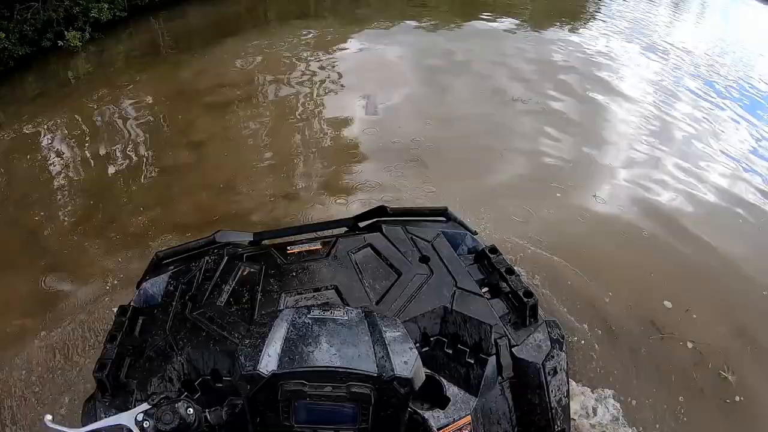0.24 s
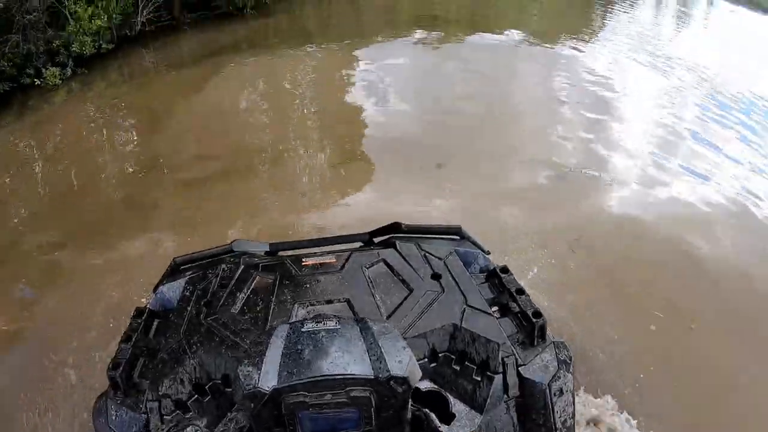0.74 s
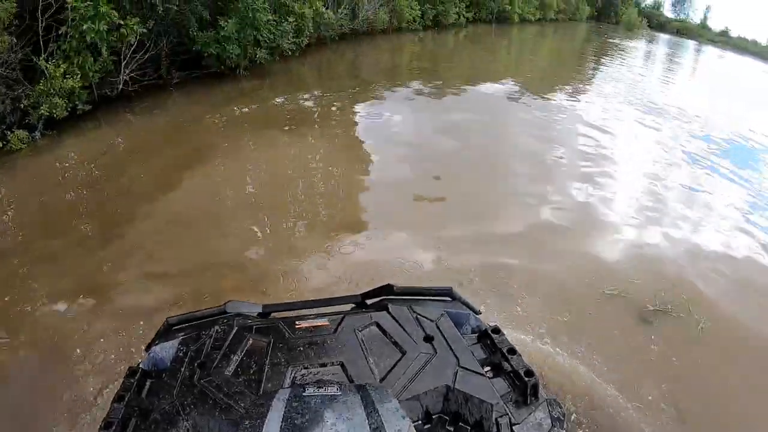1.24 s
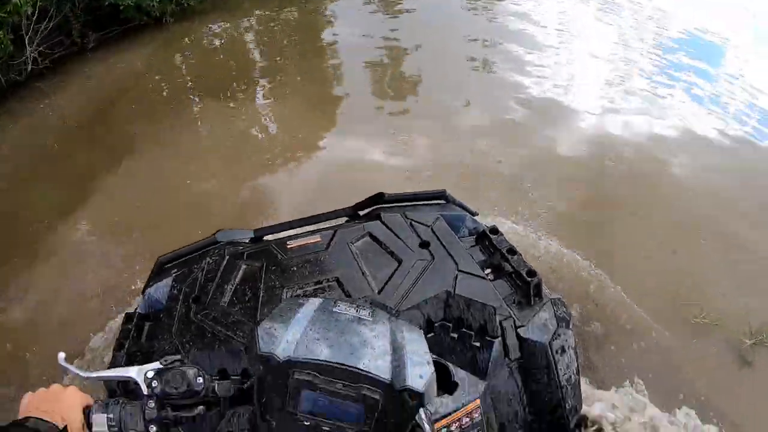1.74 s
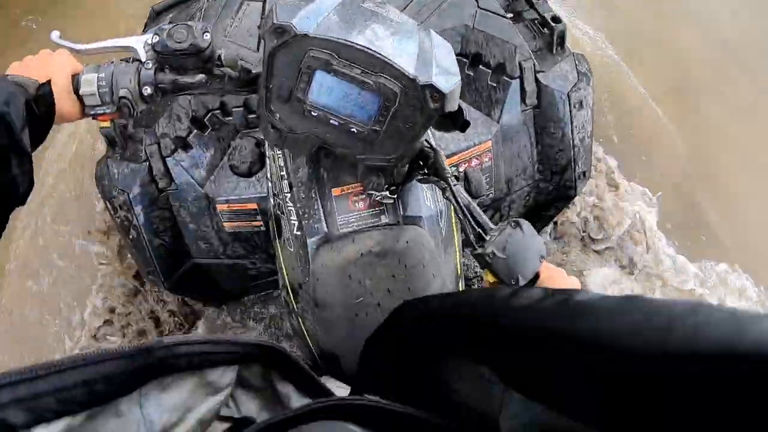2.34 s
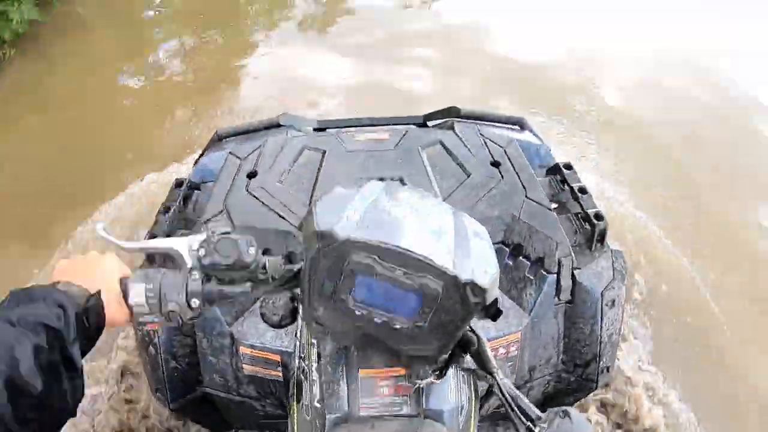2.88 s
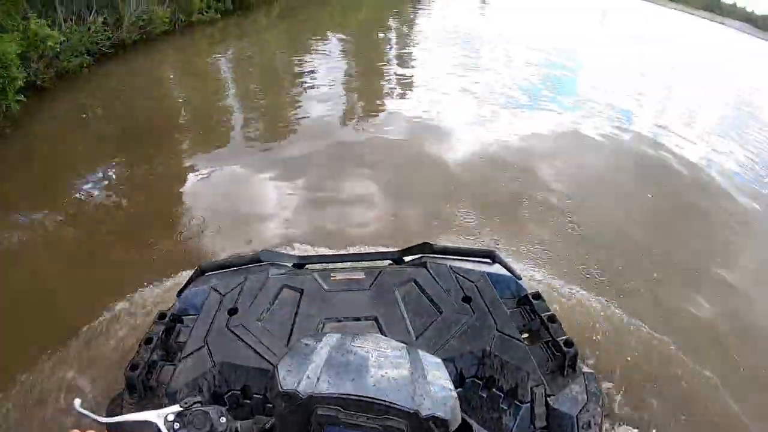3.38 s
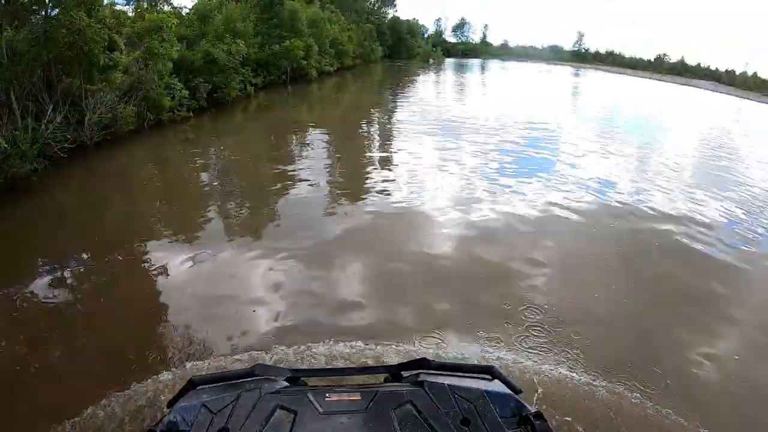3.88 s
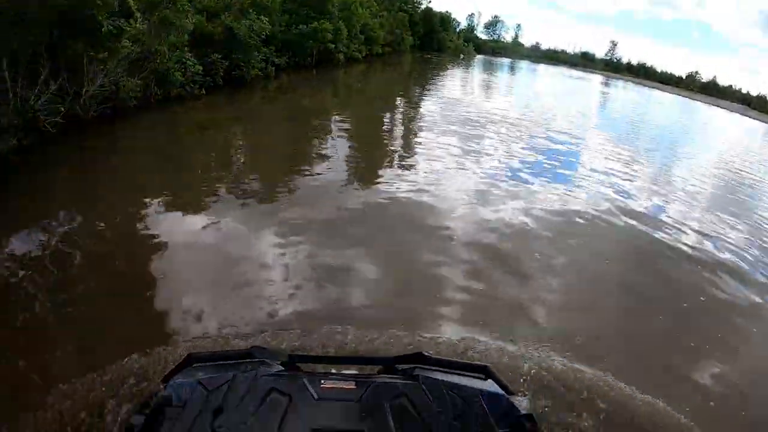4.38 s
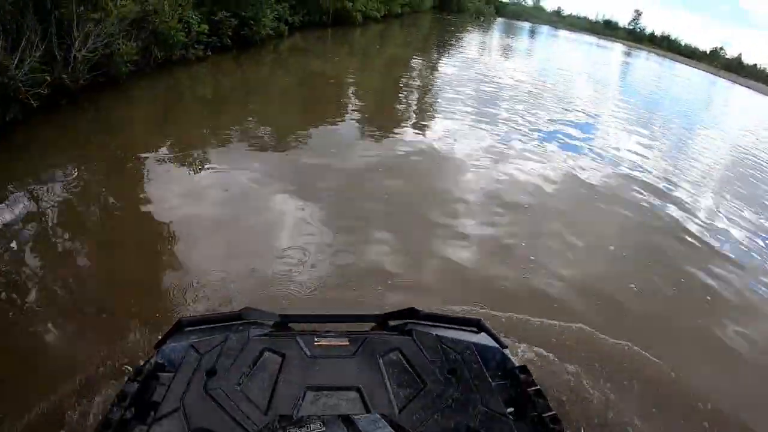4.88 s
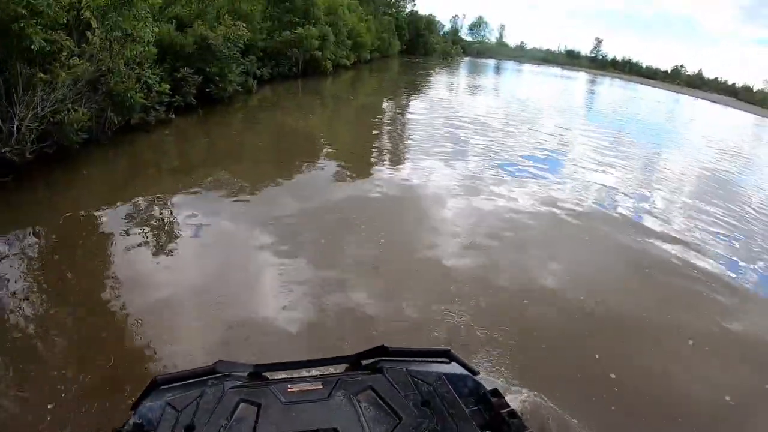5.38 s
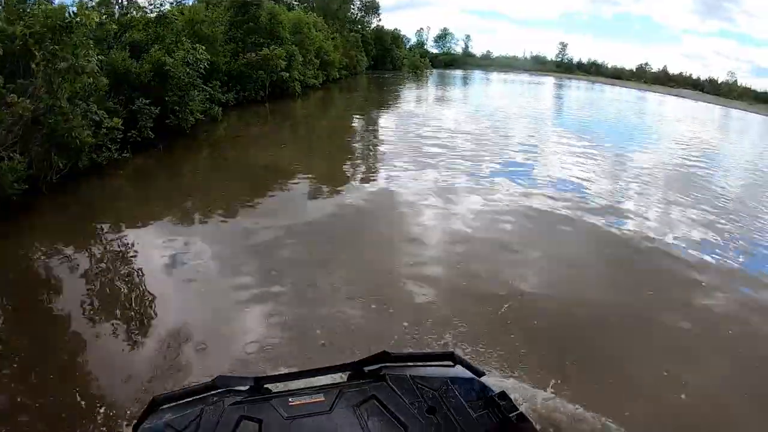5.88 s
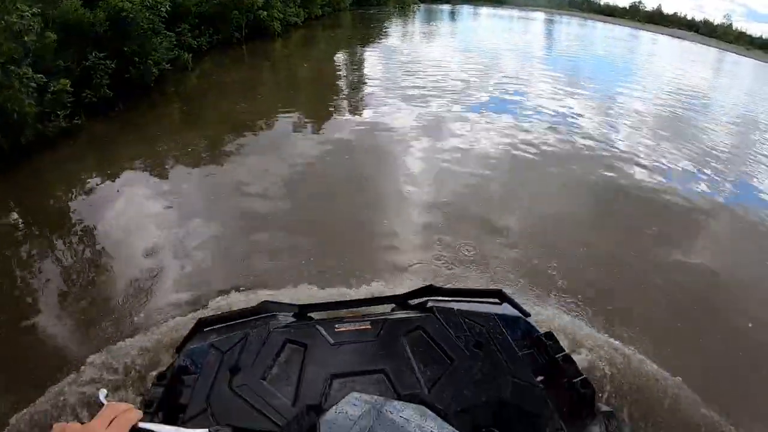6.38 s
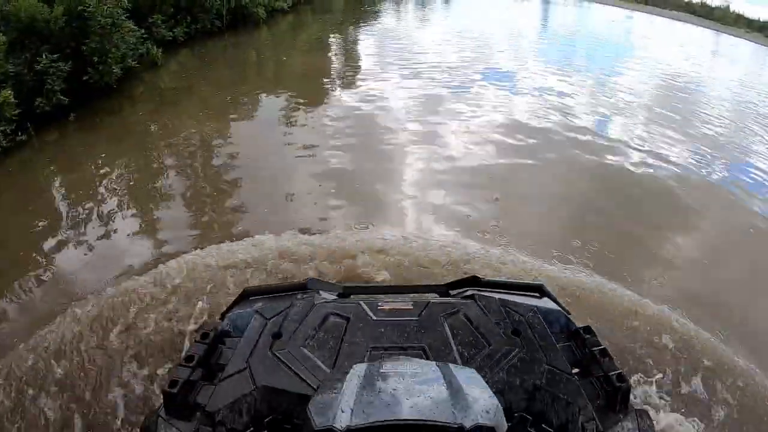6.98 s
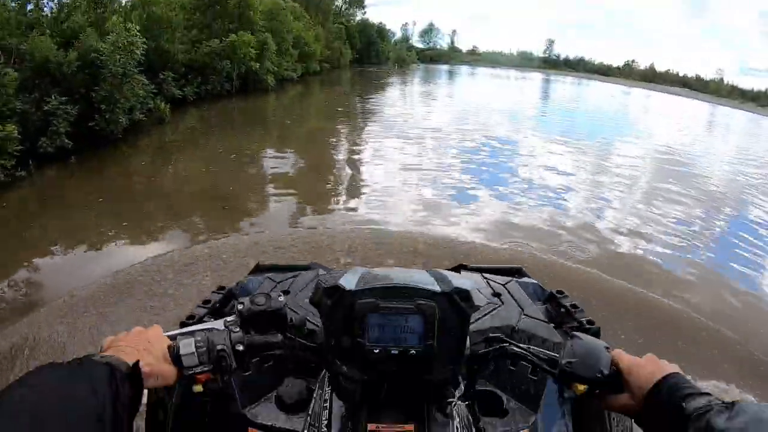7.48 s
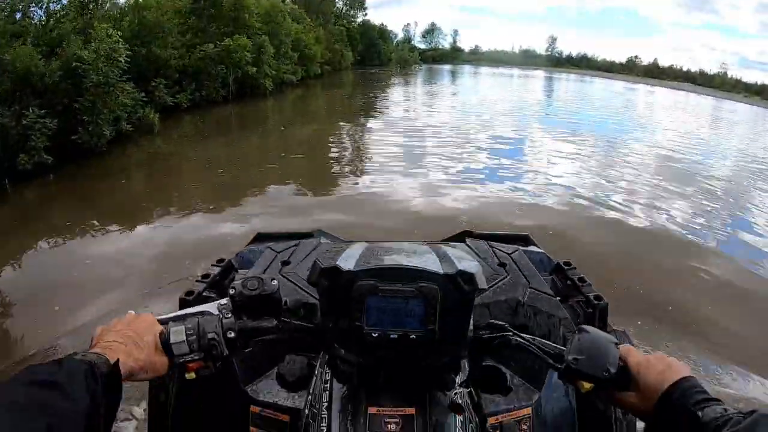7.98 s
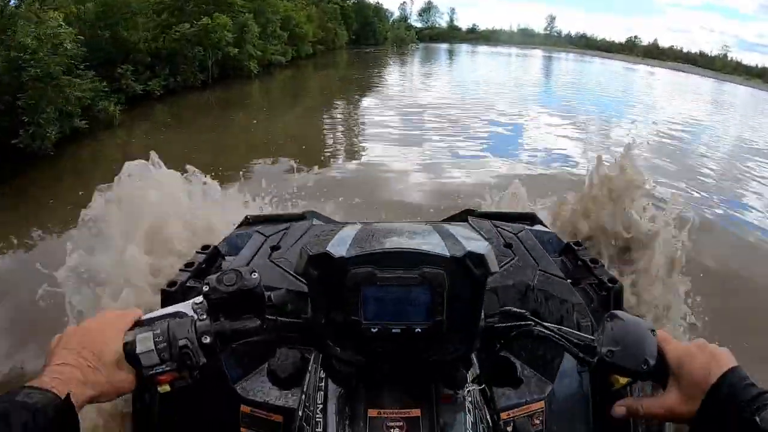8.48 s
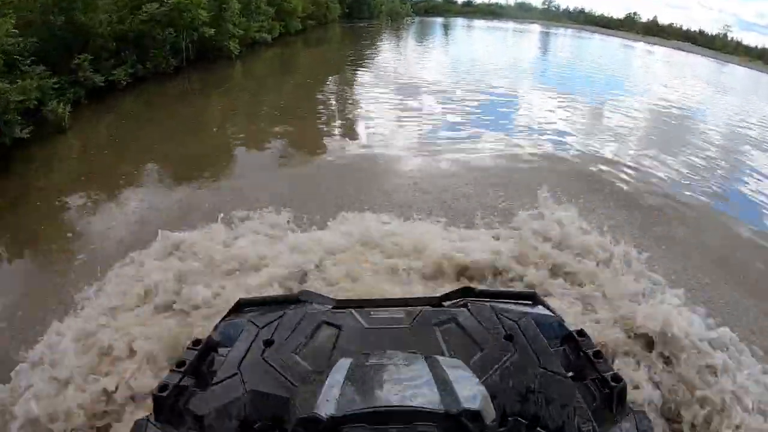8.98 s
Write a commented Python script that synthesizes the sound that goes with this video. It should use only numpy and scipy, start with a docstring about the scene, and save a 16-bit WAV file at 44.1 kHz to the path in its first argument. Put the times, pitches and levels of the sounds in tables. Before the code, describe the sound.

Close, throaty quad engine pulls, dips and snarls up to one big rev, while muddy water churns, hisses and slaps around the body.

```python
"""Quad bike wading through flood water

Recorded at the rider's chest with a two-port microphone, everything close by. The twin-cylinder engine,
a sum of crank-locked tones plus puffs of gas, pulls steadily, lets off twice, revs hard once, coasts down
into its bow wave and picks up at the very end. Gears and belt whine faintly at multiples of engine speed;
the churning water and spray are coloured noise with bubble chirps, and slaps of water hit the body."""
import sys
import numpy as np
from scipy import signal
from scipy.fft import rfft, irfft, next_fast_len
from scipy.io import wavfile
from scipy.ndimage import uniform_filter1d, minimum_filter1d, map_coordinates

SR = 44100
rng = np.random.default_rng(int(sys.argv[2]) if len(sys.argv) > 2 else 0)


def digitize_waveform(pressure):
    """Quantize a signal to 16-bit integers and store it at the path in sys.argv[1].

    Rows of a 2-D input are taken as channels; values are limited to [-1, 1].
    """
    field = np.atleast_2d(pressure).T
    bounded = np.clip(field, -1, 1)
    quanta = np.round(bounded * 32767).astype(np.int16)
    wavfile.write(sys.argv[1], SR, quanta)


N = 407043
TIME = np.arange(N) / SR  # seconds

# Throttle pulls, one curve each, with coasting between: [start_s, four_stroke_cycles_per_s]
THROTTLE_PULLS = [
    [(0.0, 27.9), (0.5, 27.6), (0.85, 30), (1.53, 28.9), (1.9, 29.1), (2.93, 30.4), (3.78, 26.7),
     (3.83, 27.1), (3.98, 30.6), (4.0, 30.7)],
    [(4.27, 23), (4.45, 25), (4.64, 23.7), (4.98, 28.9), (5.4, 30.9), (5.8, 32.7), (5.99, 31.3),
     (6.41, 32.5)],
    [(7.29, 11.2), (7.382, 14.7), (7.498, 22.8), (7.598, 29.7), (7.77, 38.3), (7.988, 50.0), (8.07, 52.0),
     (8.17, 52.2)],
    [(9.15, 14.2), (9.25, 23.8)],
]
# Engine tones, relative strength: [multiple_of_cycle_rate, coasting_db, cruising_db, wide_open_db]
ENGINE_TONES = [(1, -12, -11, -10), (2, 0, 1, 0), (3, 8.5, -8.5, -4.5), (4, -7, -7.5, -7),
                (5, 4.5, 5.5, 3.5), (6, -8, 6, 8.5), (7, -6, 2, -4.5), (8, 3.5, 5, 6.5), (9, -11, -1, 5),
                (10, -5.5, 5, 2.5), (11, 1.5, 5, 4.5), (12, -2.5, -1.5, 3), (13, 0, 3.5, -3.5),
                (14, -7.5, 0, 7), (15, 1.5, -4.5, 2), (16, -8, 0.5, -1.5)]
# Resonance of airbox and pipe: [pitch_hz, level_db]
AIRBOX_AND_PIPE = [(13, -28.5), (25, -5.5), (45, -5), (70, -0.5), (100, 0.5), (130, 1.5), (155, 3.5),
                   (190, -6), (240, -19), (320, -20), (420, -28), (550, -31), (700, -36.5), (850, -42.5),
                   (1300, -70.5)]
# How much of the bark each frequency takes: [pitch_hz, share_ratio]
BARK_SHARE = [(60, 0.38), (150, -0.32), (220, 0.31), (320, 0.97), (480, 0.96), (750, -0.1)]
# Engine loudness, coasting row then pulling row: [level_at_cruise_db, rise_db_per_cycle_per_s]
LOUDNESS_LAW = [(-23, 0.24), (-20.5, 0.42)]
# Intake bark, coasting row then pulling row: [bark_at_cruise_db, rise_db_per_cycle_per_s]
INTAKE_BARK_LAW = [(0, 0.37), (5, -0.3)]
# Harder squeezes of the throttle: [start_s, end_s, extra_bark_db]
THROTTLE_SQUEEZES = [(-.2, 0.696, 5.5), (.75, 1.65, 2), (3.758, 3.92, 5.5), (4.585, 4.945, 6),
                     (7.46, 8.202, 13.5)]
# Engine difference between the two microphone ports: [pitch_hz, side_minus_mid_db]
PORT_DIFFERENCE = [(60, -35), (160, -26), (300, -24), (430, -22), (600, -1), (850, 8)]
# Steady whine of the drive, before the left/right trim: [lower_gear_db, upper_gear_db, belt_rush_db]
STEADY_WHINE = (-57.5, -57.5, -58.5)
# Swells of the whine: [centre_s, half_length_s, lower_gear_rise_db, upper_gear_rise_db, belt_rise_db]
DRIVE_SWELLS = [(.8, .9, 13, 12, 12), (2.55, 0.74, 17, 3, 17), (3.3, .25, 4, 17, 7),
                (8.05, .3, 6, 13, 17.5)]
# Water, churn row then spray row, before their trims: [coasting_level_db, rise_when_driven_db]
WATER_LEVELS = [(-39, 1.61), (-46.5, 0.55)]
# Surges along the body, the last being the bow wave: [centre_s, half_length_s, churn_rise_db, spray_rise_db]
WATER_SURGES = [(2.1, 1.18, 2, 2.5), (6.15, 0.33, .7, 1.9), (7.42, 0.088, 3, 0.8), (8.25, 0.21, 3.5, 3),
                (8.83, 0.27, 4.5, 7.5)]
# Slaps on the body, before the shares taken by churn and spray: [start_s, level_db, decay_s]
WATER_SLAPS = [(3.835, -38, 0.022), (4.33, -46, 0.04), (6.02, -49, 0.044), (6.45, -50, .04),
               (7.43, -46, .04), (8.78, -49, 0.068), (8.939, -48, .04)]
# Colour of the churned water, relative: [pitch_hz, level_db_per_hz]
CHURN_COLOUR = [(100, 3.5), (300, 10.5), (600, 4.5), (850, -6), (1150, -0.5), (1700, -2), (2100, -4),
                (2600, -3.5), (3300, -12), (4500, -22), (8000, -47.5)]
# Colour of the spray, relative: [pitch_hz, level_db_per_hz]
SPRAY_COLOUR = [(1500, -26.5), (3000, -8.5), (4000, -3), (4700, -3.5), (5400, 0), (6300, 0), (7400, -2),
                (8400, -9), (9700, -11), (11200, -25.5), (13000, -28.5), (15500, -35)]
# Likeness of the water at the two ports: [pitch_hz, likeness_0_to_1]
PORT_LIKENESS = [(200, 1), (600, 0.66), (1200, 0.41), (2400, 0.43), (5000, 0.31), (10000, 0.39)]
# Water level between the ports: [pitch_hz, left_minus_right_db]
PORT_LEAN = [(300, 1.5), (590, -3.5), (1050, -7.5), (1850, -6.5), (3290, -3), (5820, -8), (10300, 1)]
# Phase of the shared water between the ports: [pitch_hz, left_lead_radians]
PORT_LEAD = [(400, -0.5), (700, 0.2), (1200, 1.5), (1700, -1), (2800, -2), (3300, 1.1), (4200, .5),
             (5000, -1), (6500, -3.5), (8000, -3.5), (10500, -5)]

# Cycles per second: cruising, idle, and the range over which the wide-open voice takes over
CRUISE_SPEED, IDLE_SPEED, OPEN_FROM, OPEN_AT = 29, 11.2, 45, 46
# Coasting: friction in cycles per second lost each second, and the speed at which pumping drag equals it
FRICTION, DRAG_SPEED = 13, 19.85
# Ramps of the throttle as it opens or shuts, and of the squeezes
THROTTLE_S, SQUEEZE_RAMP_S = 0.034, 0.12
# The intake gulps as the throttle snaps open; the bark lingers after it shuts
GULP_DB, GULP_S, LINGER_DB, LINGER_S = 6.5, 0.046, 6.5, 0.1
SECOND_FIRING = 3 / 8  # the second cylinder's place in the cycle


def engine(puff_cycles=0.21, rasp_hz=480, rasp_bark=0.92, sharpen_db=5, crisp_db=2, puff_db=-21,
           rasp_db=-8, growl_db=4, growl_hz=340, tone_count=44, step=7):
    """Uneven twin pulses and puffs of gas ring the airbox; an open throttle makes it bark."""
    rate = SR / step
    t = TIME[::step]
    speed, turns = crank(t)
    level_db, bark_db, throttle = effort(t, speed)
    # shares of the coasting, cruising and wide-open voices
    voices = np.maximum(1 - abs(2 * throttle - np.arange(3)[:, None]), 0)

    # no two firings are alike, and the engine runs less evenly when slow
    slow = 28 / speed
    turns = turns + .0015 * slow * drift(t, 45)
    level_db = level_db + .25 * slow ** 2 * drift(t, 35)
    bark_db = bark_db + slow * drift(t, 40)

    # cruising sharpens the pulses, a fast cruise most
    fast = np.clip((speed - 29) / 3, 0, 1)
    edge_db = sharpen_db * voices[1] * fast * (bark_db < 10)
    edge_db = uniform_filter1d(edge_db, size=600) + crisp_db * voices[1]

    pulses = np.zeros(len(t))
    for k in range(1, tone_count + 1):
        # above the table, its last eight rows repeat
        row = k - 1 if k <= 16 else 8 + (k - 9) % 8
        twin_phase = np.angle(1 + .8 * np.exp(-2j * np.pi * k * SECOND_FIRING))
        db = np.dot(ENGINE_TONES[row][1:], voices) + bark_db * read(BARK_SHARE, k * speed)
        db = db + edge_db * (k > 15)
        # wide open, the upper multiples growl
        db = db + growl_db * voices[2] * np.clip(k * speed / growl_hz * 4 - 4, 0, 1)
        pulses += amp(db) * np.cos(2 * np.pi * k * turns + twin_phase)

    # gas rushes through the valves with each firing
    puffs = unit(strokes(turns, puff_cycles) * rng.standard_normal(len(t)))
    band = signal.butter(2, [rasp_hz / 2, rasp_hz * 2], "band", fs=rate, output="sos")
    rasp = signal.sosfilt(band, puffs)
    gas = amp(puff_db) * puffs + amp(rasp_bark * bark_db + rasp_db) * rasp
    gas = gas * np.sqrt(rate / speed) / 2

    drive = reflect(amp(level_db) * (gas - pulses), .0066, .25, rate)
    rung = ring(drive, AIRBOX_AND_PIPE, rate)
    return signal.resample_poly(rung, step, 1, window=("kaiser", 10))[:N]


def crank(t):
    """Cycle rate and cycles turned: after each pull, friction and drag run the engine down to idle."""
    speed = np.zeros(len(t))
    for pull in THROTTLE_PULLS:
        s, rate = np.transpose(pull)
        # friction plus drag growing with speed squared gives a tangent curve
        angle = np.arctan(rate[-1] / DRAG_SPEED) - (t - s[-1]) * FRICTION / DRAG_SPEED
        coast = np.maximum(DRAG_SPEED * np.tan(np.clip(angle, 0, np.pi / 2)), IDLE_SPEED)
        pulled = np.where(t <= s[-1], np.interp(t, s, rate), coast)
        speed = np.where((t >= s[0]) | (speed == 0), pulled, speed)
    turns = np.cumsum(speed) * (t[1] - t[0]) - .45
    return speed, turns


def effort(t, speed):
    """Level, bark and throttle (0 shut, .5 cruising, 1 wide open): speed and load set the engine's voice."""
    held = pulling(t)
    level_db = follow_law(LOUDNESS_LAW, held, speed)
    bark_db = follow_law(INTAKE_BARK_LAW, held, speed)
    gulps = sum((t > pull[0][0]) * np.exp(-abs(t - pull[0][0]) / GULP_S) for pull in THROTTLE_PULLS[1:])
    squeeze_db = sum(db * gate(t, start, end, SQUEEZE_RAMP_S) for start, end, db in THROTTLE_SQUEEZES)
    lingers = sum(np.exp(-abs(t - pull[-1][0]) / LINGER_S) for pull in THROTTLE_PULLS)
    bark_db = bark_db + held * (GULP_DB * gulps + squeeze_db) + (1 - held) * LINGER_DB * lingers
    wide = np.clip((speed - OPEN_FROM) / (OPEN_AT - OPEN_FROM), 0, 1)
    return level_db, bark_db, held * (1 + wide) / 2


def follow_law(law, held, speed):
    """Blends the coasting and pulling laws, each a straight line in dB against engine speed."""
    coasting_db, pulling_db = (db + slope * (speed - CRUISE_SPEED) for db, slope in law)
    return (1 - held) * coasting_db + held * pulling_db


def pulling(t):
    """1 while the throttle is held, 0 while it is shut."""
    return sum(gate(t, pull[0][0], pull[-1][0], THROTTLE_S) for pull in THROTTLE_PULLS)


def strokes(turns, length):
    """A decaying puff for each cylinder; the second fires three eighths of a cycle after the first."""
    return np.exp(-(turns % 1) / length) + np.exp(-((turns - SECOND_FIRING) % 1) / length)


def reflect(x, seconds, share, rate):
    """Waves run up and down the pipe: each pulse is drawn out, its colour unchanged (an all-pass)."""
    loop = np.zeros(int(seconds * rate) + 1)
    loop[0], loop[-1] = 1, -share
    return signal.lfilter(loop[::-1], loop, x)


def ring(x, points, rate, size=4096):
    """Causal filter with the given spectrum: resonances ring after each pulse."""
    log_gain = np.log(amp(read(points, abs(np.fft.fftfreq(size, 1 / rate)))))
    # minimum phase, so that nothing sounds before its pulse
    taps = np.fft.ifft(np.exp(signal.hilbert(log_gain).conj())).real[:size // 2]
    return signal.oaconvolve(x, taps)[:len(x)]


def ports(x, angle=2.13):
    """The bass reaches both microphone ports alike; higher tones arrive out of step (angle in radians)."""
    size = next_fast_len(N + 4096)
    side_gain = amp(read(PORT_DIFFERENCE, np.fft.rfftfreq(size, 1 / SR)))
    side = irfft(rfft(x, size) * side_gain * np.exp(1j * angle), size)[:N]
    return np.array([x + side, x - side])


def churn(trim_db=5.0, throb=0.28, slap_share=0.55):
    """Wheels churn the water into bubbling foam, which shakes with each firing and swells with each slap."""
    grains = bubbles(900, 2.5, 500.6, 3502, 7)
    wash = foam(CHURN_COLOUR, grains, grain_share=0.64, patchy_db=0.5, flicker_db=0.68)
    shake = strokes(crank(TIME)[1], 0.18)
    steady = amp(water_levels()[0] + trim_db) * (1 + throb * (shake - shake.mean()))
    return wash * (steady + slap_share * slaps())


def spray(trim_db=-0.1, slap_share=0.6):
    """Fine droplets hiss above the churn and burst out with each slap on the body."""
    grains = bubbles(3000, 2.9, 3000, 13000, 4)
    hiss = foam(SPRAY_COLOUR, grains, grain_share=0.59, patchy_db=1.1, flicker_db=-0.6)
    return hiss * (amp(water_levels()[1] + trim_db) + slap_share * slaps())


def water_levels():
    """Churn and spray levels in dB: higher while the wheels are driven, swelling with each surge."""
    driven = pulling(TIME)
    return swells(WATER_SURGES, TIME) + [db + more_db * driven for db, more_db in WATER_LEVELS]


def slaps(attack_s=0.0023):
    """Envelope of the water slapping the body: a quick rise, then an exponential decay."""
    out = np.zeros(N)
    for s, db, decay_s in WATER_SLAPS:
        age = np.maximum(TIME - s, 0)
        out += amp(db) * (1 - np.exp(-age / attack_s)) * np.exp(-age / decay_s)
    return out


def foam(spectrum, grains, grain_share, patchy_db, flicker_db):
    """Countless tiny bursts merge to a patchy hiss, with single bubbles standing out."""
    frames = dict(fs=SR, nperseg=512, noverlap=384)
    hz, _, wash = signal.stft(rng.standard_normal((2, N)), **frames)
    single = signal.stft(grains, **frames)[2]
    # flatten the bubbles' own colour before mixing them in
    colour = np.sqrt(np.mean(abs(single) ** 2, axis=(0, 2)))[:, None]
    z = wash / wash.std() + grain_share * single / (colour + 0.085 * colour.max())

    # the left port shares part of the right port's water, shifted in phase
    same = np.clip(read(PORT_LIKENESS, hz), 0, 1)[:, None]
    lead = np.exp(1j * read(PORT_LEAD, hz))[:, None]
    z = np.array([same * lead * z[1] + np.sqrt(1 - same ** 2) * z[0], z[1]])

    patches = uniform_filter1d(rng.standard_normal(z.shape[1:]), size=8, axis=0)
    patches = unit(uniform_filter1d(patches, size=16, axis=1))
    flicker = unit(uniform_filter1d(rng.standard_normal(z.shape[2]), size=10))
    lean_db = np.array([.5, -.5])[:, None, None] * read(PORT_LEAN, hz)[:, None]
    z = z * amp(read(spectrum, hz)[:, None] + patchy_db * patches + flicker_db * flicker + lean_db)
    out = signal.istft(z, **frames)[1][:, :N]
    return out / out.mean(0).std()


def bubbles(per_s, spread_db, low_hz, high_hz, cycles, sizes=28):
    """Short rising chirps of many sizes, scattered to left and right."""
    out = np.zeros((2, N))
    number = int(per_s * TIME[-1] / sizes)
    for hz in np.geomspace(low_hz, high_hz, sizes):
        # age in decay times, each lasting the given cycles
        age = np.arange(int(4 * cycles * SR / hz)) * hz / SR / cycles
        envelope = np.exp(-age) * (1 - np.exp(-8 * age))
        chirp = envelope * np.sin(2 * np.pi * cycles * age * (1 + .04 * age))
        when, chance, place = rng.random((number, 3)).T
        gain = amp(spread_db * np.minimum(-np.log(chance), 4.5))
        at = (when * (N - len(chirp))).astype(int)[:, None] + np.arange(len(chirp))
        pan = np.cos(place * np.pi / 2), np.sin(place * np.pi / 2)
        for port, share in zip(out, pan):
            port += np.bincount(at.ravel(), np.outer(gain * share, chirp).ravel(), N)
    return unit(out)


def drive_whine():
    """Gears and belt turn with the engine; the left port is trimmed down and the right port up."""
    turns = crank(TIME)[1]
    lower_db, upper_db, belt_db = np.array(STEADY_WHINE)[:, None] + swells(DRIVE_SWELLS, TIME)
    whine = belt(turns, belt_db) + gear(turns, 38, lower_db) + gear(turns, 42, upper_db)
    return whine * amp([[-4], [2]])


def belt(turns, level_db, multiple=34, width_hz=330):
    """The belt rushes: noise around a fixed multiple of engine speed, rising with it."""
    carrier = np.exp(2j * np.pi * multiple * turns + 2j * drift(TIME, 120))
    return amp(level_db) * unit((drift(TIME, width_hz) * carrier).real)


def gear(turns, teeth, level_db, waver_db=1.5, wobble_cycles=0.13):
    """Meshing teeth whine at a fixed multiple of engine speed, slightly unsteady in level and pitch."""
    phase = teeth * turns + wobble_cycles * drift(TIME, 25)
    return amp(level_db + waver_db * drift(TIME, 9)) * np.sin(2 * np.pi * phase)


def swells(rows, t):
    """Bell-shaped rises in dB, summed for each column."""
    return sum(np.outer(rise_db, np.exp(-((t - s) / half) ** 2)) for s, half, *rise_db in rows)


def gate(t, start, end, ramp):
    """1 between start and end, 0 outside, with straight ramps."""
    return np.clip(np.minimum(t - start, end - t) / ramp + .5, 0, 1)


def drift(t, hz):
    """Smooth chance of rms 1 that changes about hz times a second."""
    steps = rng.standard_normal(8192)
    return unit(map_coordinates(steps, [t * hz], order=2, mode="wrap"))


def read(points, hz):
    """A spectrum joined by straight lines on a log-frequency axis."""
    f, value = np.transpose(points)
    return np.interp(np.log(hz + 1), np.log(f + 1), value)


def amp(db):
    """Decibels to gain."""
    return 10 ** (np.asarray(db) / 20)


def unit(x):
    """Scales to rms 1."""
    return x / np.sqrt(np.mean(x ** 2) + 1e-20)


def scene():
    """Engine, water and drive, all close to the microphone."""
    return ports(engine()) + churn() + spray() + drive_whine()


def record(dry, ceiling=.82, edge_hz=15700):
    """A limiter holds the highest peaks; then the recorder's band limit."""
    allowed = np.minimum(ceiling / (abs(dry).max(0) + 1e-9), 1)
    limited = dry * uniform_filter1d(minimum_filter1d(allowed, size=500), size=500)
    lowpass = signal.firwin(511, edge_hz, window=("kaiser", 9), fs=SR)
    return signal.oaconvolve(limited, lowpass[None], "same")


dry = scene()
out = record(dry)
digitize_waveform(out)
```